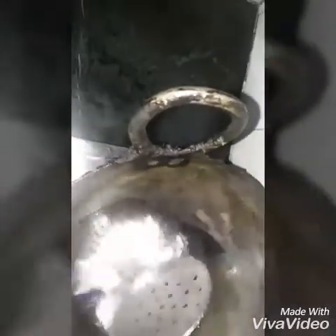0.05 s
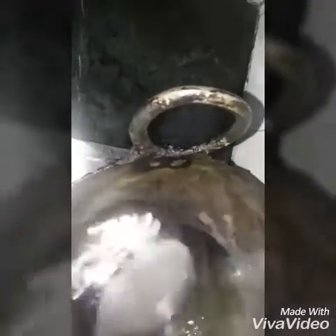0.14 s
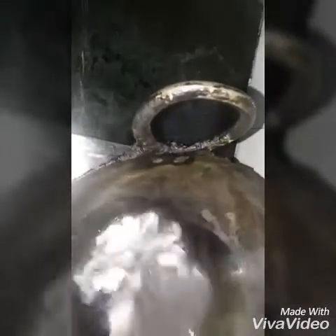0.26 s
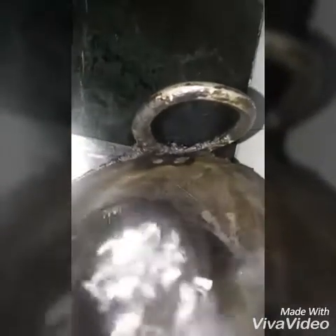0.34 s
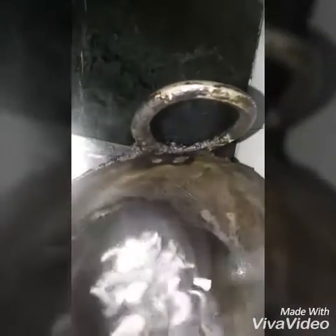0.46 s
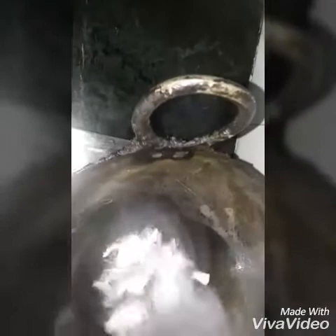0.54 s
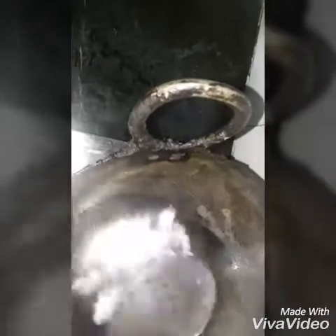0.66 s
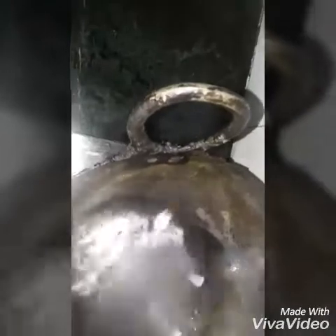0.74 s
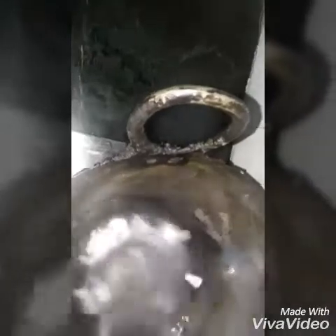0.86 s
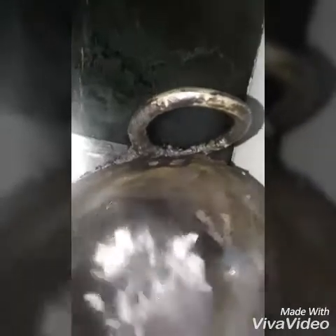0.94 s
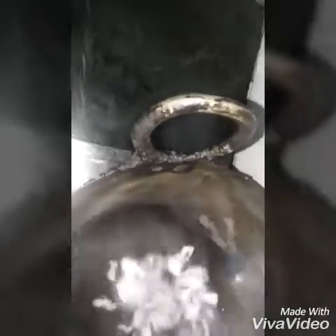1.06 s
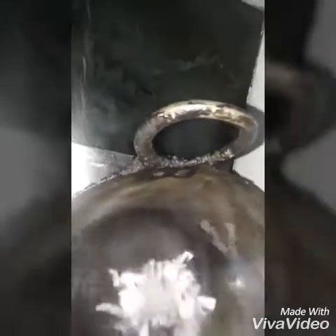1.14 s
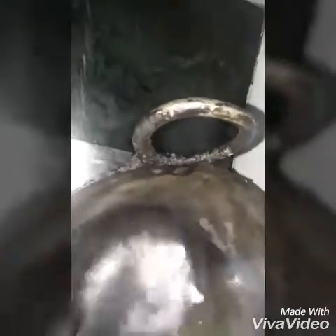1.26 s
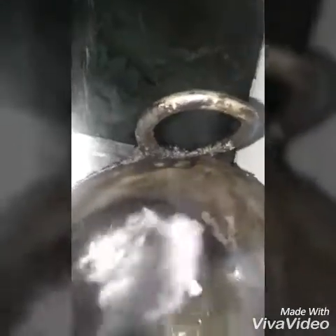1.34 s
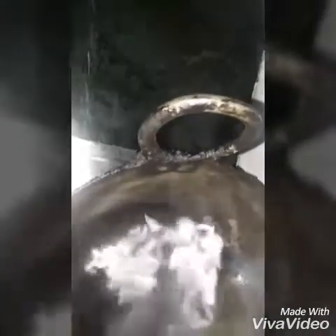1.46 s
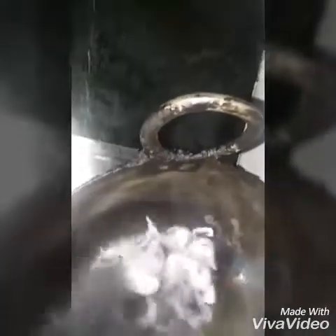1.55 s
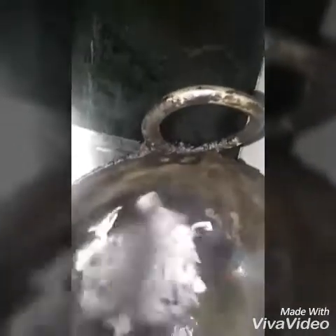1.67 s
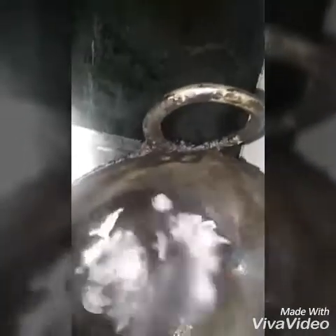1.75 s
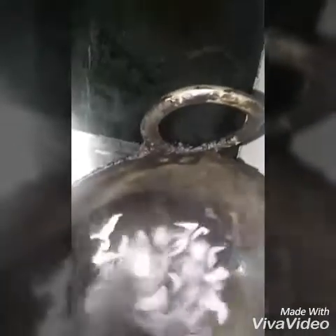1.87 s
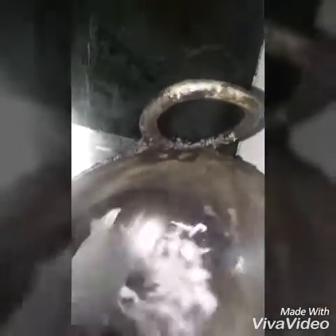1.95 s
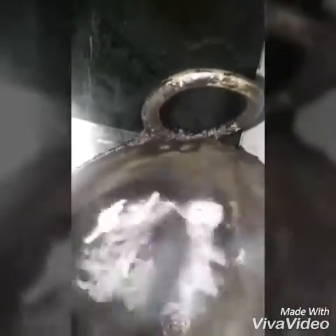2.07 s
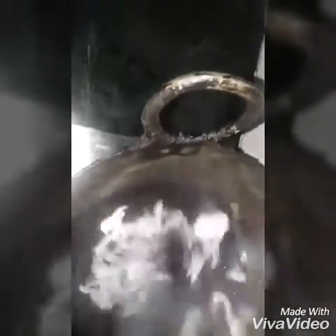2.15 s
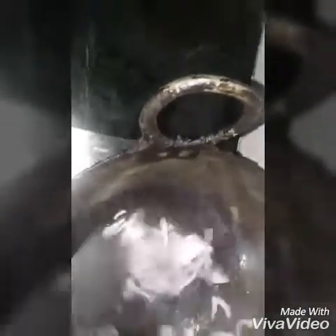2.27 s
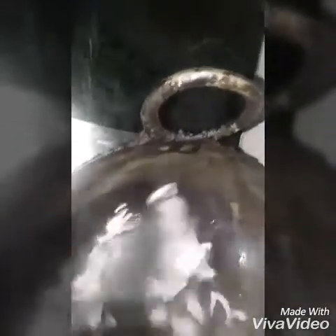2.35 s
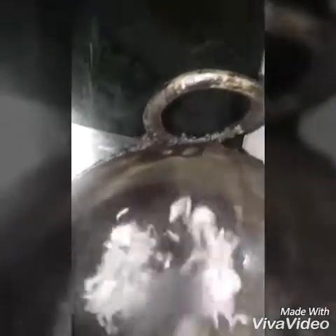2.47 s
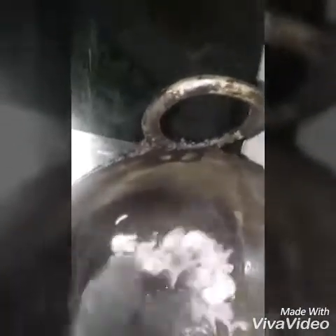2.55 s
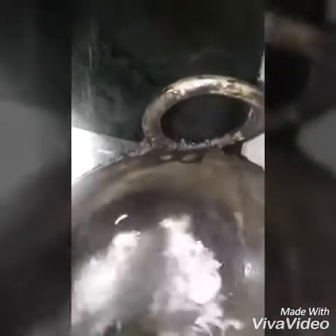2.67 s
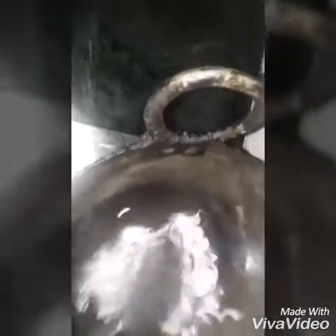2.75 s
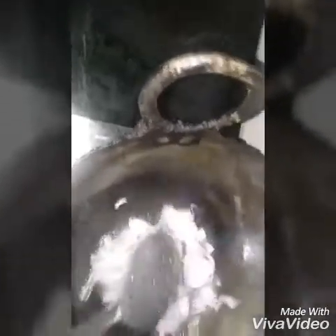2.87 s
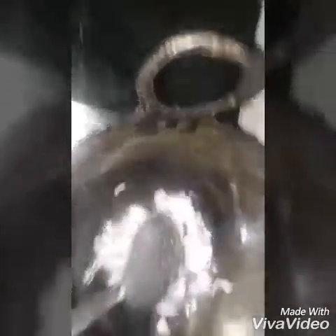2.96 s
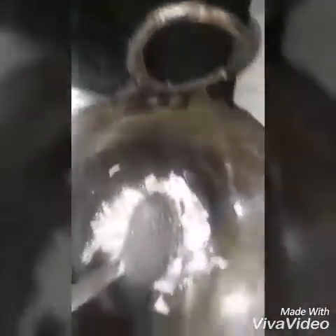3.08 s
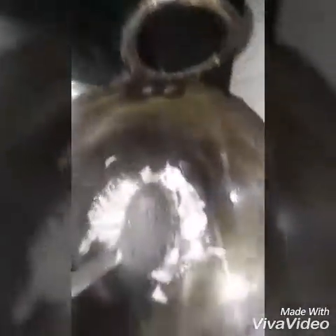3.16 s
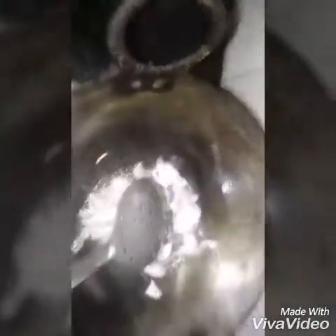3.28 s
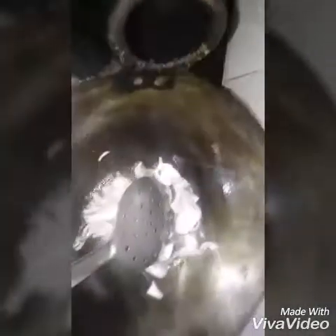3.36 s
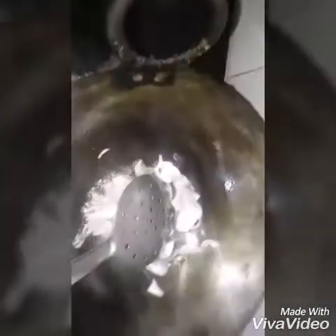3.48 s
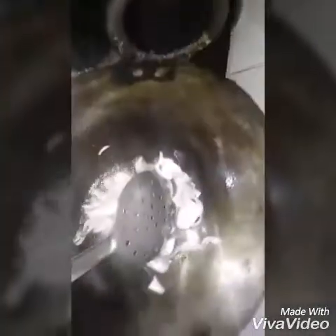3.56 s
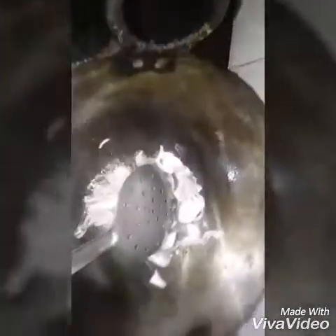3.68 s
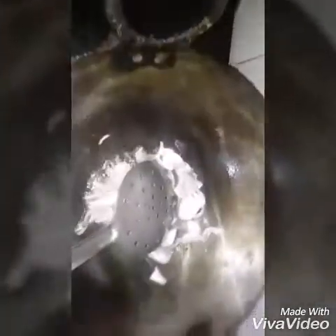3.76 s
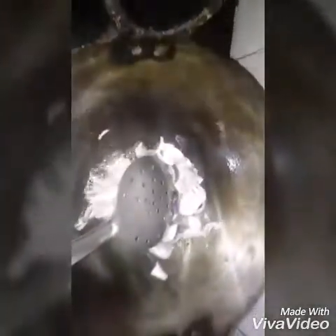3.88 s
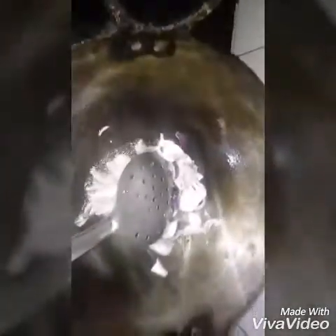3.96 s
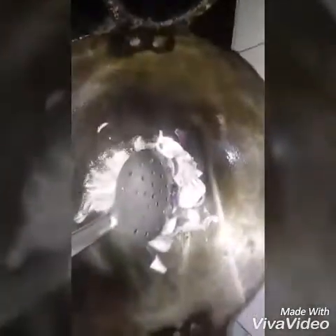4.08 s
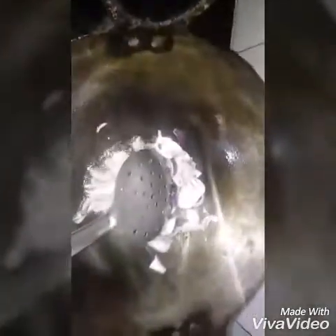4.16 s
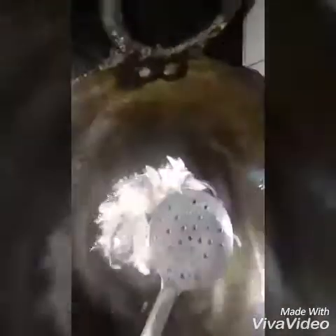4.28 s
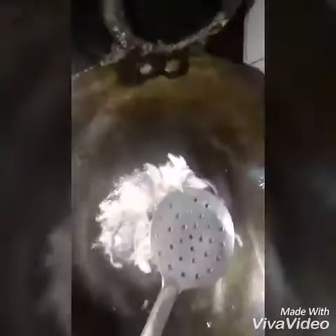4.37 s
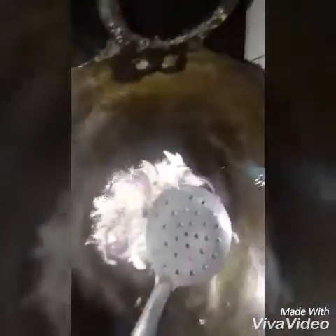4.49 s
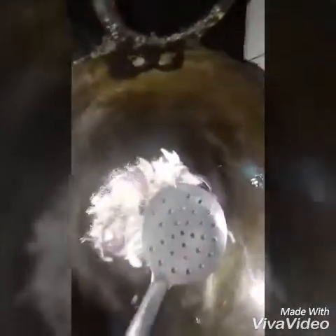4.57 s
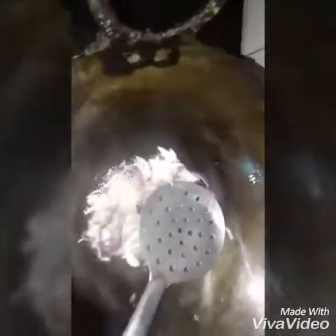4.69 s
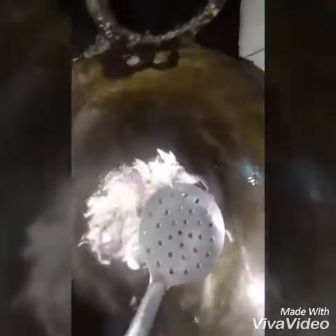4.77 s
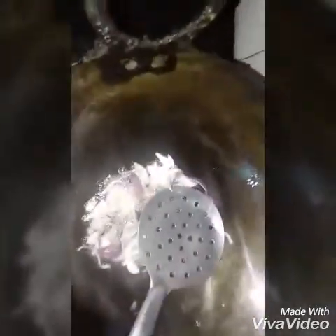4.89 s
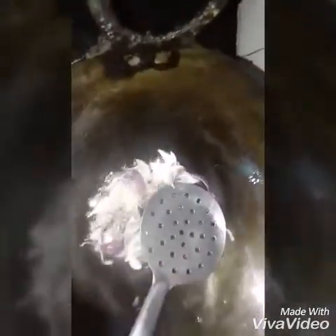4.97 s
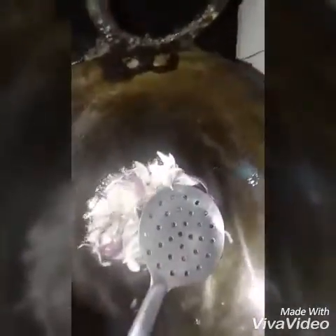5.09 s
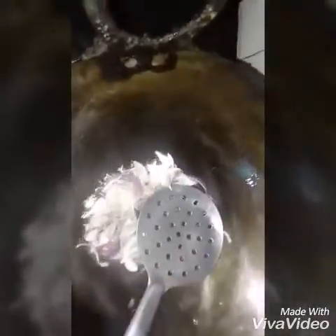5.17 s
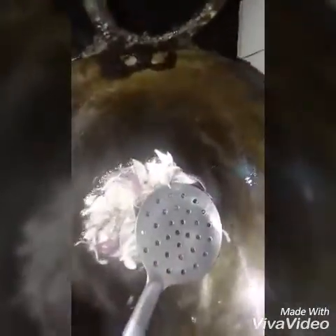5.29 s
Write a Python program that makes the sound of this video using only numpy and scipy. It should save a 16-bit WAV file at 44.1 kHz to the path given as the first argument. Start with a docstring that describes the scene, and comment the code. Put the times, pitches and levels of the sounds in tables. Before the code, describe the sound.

A nearby microphone catches vigorous onion sizzling, bubbling blips and bright popping drops above a faint flame rumble with soft low bumps. Brief drags lead to one hard metallic knock, followed later by a cluster of clicks and rattling touches. The frying then calms, a dry cut click interrupts it, and the remaining sizzle loses treble. Close kitchen walls add slight reverberation; only the treble spreads in stereo.

```python
"""In a small kitchen, chopped onions fry in a metal wok and are turned with a metal spoon.
Clustered noise bursts make the sizzle, decaying tones the bubbles and crackle, short pings and noise the spits.
Wet onion squeals as a noisy, wandering tone; the spoon drags, taps and knocks, ringing the pan's modes.
The burner's shaped noise rumbles below with soft bumps. Late on, the sizzle calms; then an abrupt edit cut
clicks, and the sizzle is duller from there on."""
import sys
import numpy as np
from scipy import signal
from scipy.fft import rfft, irfft
from scipy.io import wavfile

SR = 44100
rng = np.random.default_rng(int(sys.argv[2]) if len(sys.argv) > 2 else 0)


def master(y):
    """Save y as 16-bit WAV."""
    cut = np.clip(np.atleast_2d(y).T, -1, 1)
    pcm = np.round(cut * 32767)  # scale
    wavfile.write(sys.argv[1], SR, pcm.astype(np.int16))


N = 234876
TIME = np.arange(N) / SR

# spoon blows, coloured by the spot and the onion under it; the row at 0.868 s is a sharp, spit-like crack:
# start_s, rise_s, contact_t60_s, rattle_db, boom_db, body_db, clack_db, clink_db, ring_db, crack_db,
# favoured_mode_hz
BLOWS = [(0.802, 0.00044, 0.011, -33, -32.5, -22.5, -28.5, -39, -31.5, -26.5, 1410),
         (0.805, 0.0004, 0.0066, -28, -42, -33.5, -34, -43, -27.5, -26.5, 3860),
         (0.817, 0.0016, 0.055, -25, -42, -43, -38, -47, -41, -30.5, 3860),
         (0.868, 0.0014, 0.024, -35, -51.5, -46, -47, -50, -42, -33.5, 4430),
         (2.607, 0.0015, 0.024, -23, -51.5, -55, -40.5, -54, -63, -57, 1380),
         (2.744, 0.003, 0.017, -22, -52, -46, -38, -38, -41, -28.5, 4460),
         (2.753, 0.001, 0.011, -17, -47.5, -42, -29.5, -32, -33, -32, 3430),
         (2.765, 0.001, 0.018, -23, -55.5, -45, -40, -40, -40, -36, 4430),
         (2.917, 0.0028, 0.017, -31, -41.5, -43.5, -25, -34.5, -28, -27.5, 2900),
         (3.106, 0.0002, 0.012, -17, -49.5, -35.5, -28, -27.5, -36, -35.5, 3230),
         (3.117, 0.00098, 0.026, -18, -54, -40.5, -35, -35, -37.5, -38.5, 3215),
         (3.153, 0.0022, 0.02, -15, -63, -38.5, -36.5, -46, -54, -45, 1102),
         (3.179, 0.001, 0.02, -10, -65, -49, -41, -50, -55, -47, 1420),
         (3.366, 0.0004, 0.007, -22.5, -59.5, -46, -48.5, -42.5, -42.5, -37, 4430),
         (3.871, 0.0007, 0.012, -20, -63.5, -56, -49, -38, -46, -49, 2690),
         (4.055, 0.00048, 0.0068, -25, -70, -59, -53, -47.5, -54, -46.5, 2500),
         (4.1915, 0.0003, 0.0049, -23.5, -59, -46, -39.5, -45, -49, -32.5, 1600),
         (4.524, 0.0011, 0.016, -23, -72, -53, -53, -57, -70, -46.5, 1700),
         (4.742, 0.0005, 0.009, -18.5, -64, -54, -60, -61, -55.5, -51.5, 1033),
         (4.785, 0.002, 0.05, -7, -65.5, -53.5, -58.5, -63, -70, -72, 942),
         (5.24, 0.00086, 0.012, -18, -75, -69, -67, -59.5, -48, -44.5, 3490)]
# modes of pan and spoon: pitch_hz, level_db, undamped_t60_s
PAN_MODES = [(290, -9, .08), (496, -5, .12), (565, -3, .13), (733, -7, .1), (942, -5, .08), (1025, -1, .12),
             (1105, -5, .08), (1190, -4, .06), (1385, 3, .05), (1432, 1, .08), (1622, -2, .06),
             (1710, -3, .06), (2080, -6, .1), (2198, -6, .06), (2500, -7, .04), (2690, -7, .05),
             (2870, -3, .035), (3215, -4, .07), (3445, 1, .05), (3860, -4, .04), (4430, -2, .035),
             (4840, 3, .04), (5150, -4, .03), (5570, -4, .03), (5880, -3, .03)]
# the click of the edit cut: start_s, level_db of its unscaled tones and grit
CUT = (4.5724, -29)
CUT_S = CUT[0]

LIVELY_DB = -47.5   # vigour while the onions are turned
DULL_DB = 13   # the sizzle's treble is lower by this much from the edit cut on
STEREO_WIDTH = .5   # side signal of the sizzle relative to its mid signal
OPPOSITE = np.array([[1], [-1]])   # the side signal enters left and right with opposite signs


def from_db(db):
    """Decibels become an amplitude ratio."""
    return 10 ** (np.asarray(db) / 20)


def rms_one(x):
    """Scales a signal to unit effective value."""
    return x / np.sqrt(np.mean(x ** 2) + 1e-20)


def peak_one(x):
    """Scales a signal to unit peak."""
    return x / np.abs(x).max()


def at_hz(points, hz):
    """Interpolates a level over logarithmic frequency."""
    hz_points, db_points = np.transpose(points)
    return np.interp(np.log(hz), np.log(hz_points), db_points)


def band(x, low_hz, high_hz, order=2):
    """Band-pass filtering keeps one frequency range."""
    edges_hz = [low_hz, min(high_hz, .45 * SR)]
    return signal.sosfilt(signal.butter(order, edges_hz, "band", fs=SR, output="sos"), x)


def resonate(x, hz, width_hz):
    """A two-pole resonance, with gain 1 at its centre."""
    radius = np.exp(-np.pi * width_hz / SR)
    zeros = np.array([1, 0, -1]) * (1 - radius ** 2) / 2
    poles = [1, -2 * radius * np.cos(2 * np.pi * hz / SR), radius ** 2]
    return signal.lfilter(zeros, poles, x)


def colour(x, spectrum):
    """Spectral weighting shapes a steady sound."""
    size = 2 ** 18
    gain = from_db(at_hz(spectrum, np.fft.rfftfreq(size, 1 / SR) + 1))
    return irfft(rfft(x, size) * gain)[..., :N]


def drift(rate_hz):
    """Low-passed noise of unit effective value makes a random drift."""
    r = np.exp(-2 * np.pi * rate_hz / SR)
    slow = signal.lfilter([1], [1, -2 * r, r * r], rng.standard_normal(N + SR))
    return rms_one(slow[SR:])   # without the filter's first second


def add(track, s, sound):
    """Superposition of a sound on a track from a given second."""
    start = int(s * SR)
    track[start:start + len(sound)] += sound[:N - start]


def burst(x, t60, rise_s):
    """An exponential rise and decay shape a sound."""
    t = TIME[:len(x)]
    return x * from_db(-60 * t / max(t60, .002)) * (1 - np.exp(-t / rise_s))


def sine(hz, t):
    """A simple tone of random phase."""
    return np.sin(2 * np.pi * (hz * t + rng.random()))


def burner(level_db=-75):
    """Broadband flame noise rumbles with randomly modulated strength."""
    # spectrum of the flame: pitch_hz, relative_level_db
    flame_spectrum = [(13, -67), (22, -2), (32, -6), (86, 8.5), (123, 0.5), (232, -22), (300, -12),
                      (376, -63), (400, -18), (520, -17), (880, -120)]
    rumble = colour(rng.standard_normal(N), flame_spectrum)
    return from_db(level_db) * rms_one(rumble * from_db(4 * drift(14)))


def low_bumps(bump_db=-1, bump_t60=0.12, lead_s=0.0046, pat_db=-9, pat_t60=.06,
              random_per_s=2, random_db=-60.5, spread_db=6):
    """Filtered noise transients make soft low bumps, each with a pat, at set times and at random."""
    # bumps at set times: start_s, level_db
    set_bumps = [(0.177, -56), (0.516, -58), (0.7, -54), (0.789, -45), (0.879, -53.5), (1.065, -58),
                 (1.242, -53.5), (1.413, -51), (1.588, -66), (1.76, -62), (1.923, -48), (2.107, -48),
                 (2.3, -52), (2.485, -54), (3.29, -61.5), (3.444, -57.5), (3.588, -51.5), (3.937, -57),
                 (4.312, -47.5), (4.513, -50.5), (4.656, -52), (4.813, -54), (4.975, -56), (5.132, -52.5)]
    out = np.zeros(N)
    chance = rng.random((int(random_per_s * N / SR), 2))
    random_bumps = [(when * TIME[-1], random_db + spread_db * (size - .5)) for when, size in chance]
    for s, level_db in list(set_bumps) + random_bumps:
        noise = rng.standard_normal(SR // 4)
        thump = peak_one(band(burst(noise, bump_t60, 0.0033), 65, 126, order=3))
        pat = peak_one(band(burst(noise, pat_t60, 0.0057), 110, 266))
        add(out, max(s - lead_s, 0), from_db(level_db + bump_db) * thump)
        add(out, s, from_db(level_db + pat_db) * pat)
    return out


def kitchen(x, t60=0.38, treble_db=-3):
    """Reverberation of close walls, from 9 ms on; the treble decays faster and differs from side to side."""
    t = TIME[:SR // 2]
    noise = rng.standard_normal((3, len(t)))
    treble = band(noise[:2], 4000, 13000) * from_db(treble_db - 75 * t / t60)
    tail = band(noise[2], 130, 12300) * from_db(-60 * t / t60) + treble
    tail = tail * np.clip(t / .007 - 1.3, 0, 1)   # silent until the first reflections
    return signal.fftconvolve(x[None], tail / np.sqrt(np.sum(tail[0] ** 2)), axes=1)[:, :N]


def bowl(x, spread_db=-9):
    """Early reflections off the wok's wall reach the two sides with opposite sign."""
    echoes = burst(rng.standard_normal(SR // 100), 0.0025, 0.00056)
    side = signal.fftconvolve(x, echoes / np.linalg.norm(echoes))[:N]
    return x + from_db(spread_db) * side * OPPOSITE


def wok(contact, ring_db=-9, scatter_db=2.5):
    """Modal response: a contact is heard directly and through modes of random strength for each spot."""
    t = TIME[:SR // 4]
    ring = 0
    for hz, mode_db, t60 in PAN_MODES:
        strength = from_db(mode_db + scatter_db * rng.standard_normal()) / np.sqrt(t60)
        ring = ring + strength * from_db(-60 * t / t60) * sine(hz, t)
    ringing = signal.fftconvolve(contact, ring / np.linalg.norm(ring))[:len(contact)]
    return contact + from_db(ring_db) * ringing


def mode_gap(x, hz=395, width_hz=110):
    """Anti-resonance: the pan hardly answers between its two lowest modes."""
    return x - resonate(x, hz, width_hz)


def cut_click(length_s=0.00336, grit_db=-6):
    """A gated transient: the abrupt edit cut is heard as a dry click that stops dead, with no ring."""
    # colour of the click: pitch_hz, level_db
    click_tones = [(1020, -6.5), (1750, -9), (2200, -8), (3400, -13.5), (4450, -0.5), (6100, -4)]
    out, t = np.zeros(N), TIME[:int(length_s * SR)]
    tones = sum(from_db(db) * sine(hz, t) for hz, db in click_tones)
    grit = from_db(grit_db) * rms_one(band(rng.standard_normal(len(t)), 2800, 10500))
    add(out, CUT_S, from_db(CUT[1]) * (tones + grit) * signal.windows.tukey(len(t), .2))
    return out


def drags(slips_per_s=170, sing_db=-3, sing_hz=1018, sing_width_hz=22):
    """Stick-slip friction of the dragged rim ticks unevenly, and one mode of the pan sings along."""
    # strokes of the spoon: start_s, length_s, level_db
    strokes = [(0.509, 0.041, -45.5), (0.622, 0.02, -47), (0.697, .018, -50.5), (2.492, 0.095, -52.5)]
    out, t = np.zeros(N), TIME[:SR // 4]
    for s, length_s, db in strokes:
        moving = t < length_s
        slips = (rng.random(len(t)) < slips_per_s / SR) * moving + 1e-6 * moving
        envelope = signal.lfilter([1], [1, -np.exp(-1 / (0.0023 * SR))], slips)
        grit = envelope * rng.standard_normal(len(t))
        rub = rms_one(wok(band(grit, 1100, 6400)))
        sing = rms_one(resonate(grit, sing_hz, sing_width_hz))
        add(out, s, from_db(db) * np.sqrt(length_s / t[-1]) * (rub + from_db(sing_db) * sing))
    return out


def shoves(t60=0.035, rise_s=0.0015):
    """Forced low resonances thud softly as the spoon shoves through the onion."""
    # shoves around the blows: start_s, peak_db
    pushes = [(0.793, -27), (2.61, -45.5), (2.64, -48), (2.75, -39), (2.91, -35.5), (2.934, -35.5),
              (3.099, -46), (3.155, -44), (4.731, -52), (5.141, -54)]
    # low pan resonances that a shove wakes: pitch_hz, width_hz, level_db
    low_resonances = [(295, 90, -6), (517, 150, 0.5)]
    out = np.zeros(N)
    for s, peak_db in pushes:
        push = burst(rng.standard_normal(SR // 2), t60, rise_s)
        thud = 0
        for hz, width_hz, db in low_resonances:
            answer = resonate(resonate(push, hz, width_hz), hz, 3 * width_hz)
            thud = thud + from_db(db) * peak_one(answer)
        add(out, s, from_db(peak_db) * peak_one(thud))
    return out


def clang():
    """Free vibration: the first, hardest blow leaves the metal's modes singing."""
    # singing modes: pitch_hz, level_db, t60_s
    singing_modes = [(496, -39, .12), (564, -33, .16), (735, -35, .11), (1026, -40, .13), (1427, -29, .1),
                     (3463, -24.5, .29), (4830, -31, .05), (8220, -43, .14)]
    out, t = np.zeros(N), TIME[:SR // 2]
    for hz, level_db, t60 in singing_modes:
        add(out, BLOWS[0][0], from_db(level_db) * burst(sine(hz, t), t60, .002))
    return out


def spoon(rattle_t60=0.21, grit_db=5.5, top_db=-12.0, scatter_db=2.5, spot_db=8, spot_octaves=0.063, blow_s=.015):
    """Impact excitation rings the modes, damped by the spoon, and the rim rattles along the pan."""
    out, t = np.zeros(N), TIME[:SR // 3]
    edges_hz = [250, 750, 1250, 1900, 2950, 4200, 6500, 13000]

    def strength(x):
        """Effective value over the span of the blow."""
        return np.sqrt(np.mean(x[:int(blow_s * SR)] ** 2))

    for s, rise_s, contact_t60, rattle_db, *colour_db, spot_hz in BLOWS:
        noise = rng.standard_normal((3, len(t)))
        slips = from_db(grit_db * rms_one(band(noise[2], 58, 290, order=1)))
        rattle = wok(burst(noise[1] * slips, rattle_t60, 0.0034), ring_db=-9.5)
        contact = burst(noise[0], contact_t60, rise_s) + from_db(rattle_db) * rattle
        damping = min(contact_t60 / .02, .9)   # a brief touch lets the modes die away sooner
        modes = 0
        for hz, db, t60 in PAN_MODES:
            favour_db = spot_db * np.exp(-(np.log2(hz / spot_hz) / spot_octaves) ** 2)
            mode_db = db + favour_db + scatter_db * rng.standard_normal()
            modes = modes + from_db(mode_db) * burst(sine(hz, t), t60 * damping, rise_s)
        metal = modes / strength(modes) + contact / strength(contact)
        # the top band has no column of its own: it follows the crack band
        for db, low, high in zip(colour_db + [colour_db[-1] + top_db], edges_hz, edges_hz[1:]):
            part = band(metal, low, high, order=4)
            dull_db = DULL_DB / 2 * (s > CUT_S and high == edges_hz[-1])
            add(out, s, from_db(db - dull_db) * part / strength(part))
    return out


def vigour(flare_db=1.5, flare_s=0.103):
    """Boiling rate in dB: each touch of the spoon puts wet onion on hot metal, which flares and relaxes."""
    # vigour of the frying, lively and then calmer: time_s, level_db
    frying = [(0.0, -52), (0.32, -54), (0.7, -47.5), (1.01, -52), (1.34, -47.5), (1.7, -50.5), (1.88, -48),
              (2.32, -48.5), (2.54, -47.5), (3.04, -48.5), (3.38, -55.5), (3.75, -63), (3.95, -61.5),
              (4.07, -59.5), (4.22, -56.5), (4.41, -60.5), (4.5, -61)]
    # vigour after the edit cut: time_s, level_db
    settled = [(4.6, -63), (5.32, -67)]
    s, db = np.transpose(np.vstack([frying, settled]))
    flares = [(TIME > row[0]) * np.exp(-np.abs(TIME - row[0]) / flare_s) for row in BLOWS]
    return np.interp(TIME, s, db) + flare_db * np.max(flares, axis=0)


def steam(rest_db=-3, rest_hz=4600, follows=0.85, waver_db=3, wander_hz=300,
          rise_s=0.022, fall_s=.05, sag_hz_per_s=3000):
    """Power addition of a leak that follows the frying and of presses; gives level in dB and mean pitch in Hz."""
    # onion pressed on the metal: loudest_s, level_db, pitch_hz
    presses = [(0.521, -40.5, 4540), (0.601, -43.5, 5060), (0.735, -41, 5040), (0.999, -45.5, 4790),
               (1.32, -43.5, 4670), (1.71, -46, 4400), (1.862, -41.5, 5130), (1.95, -46, 4385),
               (2.001, -46, 4050), (2.07, -46.5, 4460), (2.26, -45, 4950), (2.39, -44.5, 4690),
               (2.45, -42, 4900), (2.57, -43.5, 4730), (2.858, -45, 4445), (3.097, -40.5, 5200),
               (3.571, -45, 4590), (3.749, -49, 3796), (4.282, -51.5, 5040), (4.78, -51, 4550),
               (4.899, -54.5, 3510)]
    leak_db = LIVELY_DB + rest_db + follows * (vigour() - LIVELY_DB) + waver_db * drift(8.05)
    power = from_db(leak_db) ** 2
    weighted_hz = power * (rest_hz + wander_hz * drift(6))
    for s, db, hz in presses:
        t = TIME - s
        press = (from_db(db) * np.exp(-np.maximum(-t / rise_s, t / fall_s))) ** 2
        power = power + press
        weighted_hz = weighted_hz + press * (hz - sag_hz_per_s * t)
    return 10 * np.log10(power), weighted_hz / power


def squeal(width_hz=380, level_db=-3, wander_hz=150):
    """Narrow-band noise: steam sputters out under the onion as a rough squeak of wandering pitch."""
    steam_db, hz = steam()
    phase = 2 * np.pi * np.cumsum(hz + wander_hz * drift(25.0)) / SR
    squeak = drift(width_hz) * np.cos(phase) + drift(width_hz) * np.sin(phase)
    sputter = from_db(3 * drift(45))
    return from_db(steam_db + level_db) * rms_one(squeak * sputter)


def bubbles(per_s=220, level_db=-5.5, size_db=4.0, cycles=14):
    """Damped bubble oscillation: simmering water in the onion makes rising blips of scattered pitch."""
    middle_db = fry_levels()[1]   # blips follow the middle of the sizzle
    out, t = np.zeros(N), TIME[:SR // 20]
    for when, pitch, size in rng.random((int(per_s * N / SR), 3)):
        hz = 1000 * 4 ** pitch
        blip_db = middle_db[int(when * N)] + level_db + size_db * min(-np.log(1 - size), 2)
        blip = burst(np.sin(2 * np.pi * hz * t * (1 + 4 * t)), cycles / hz, 0.00039)
        add(out, when * N / SR, from_db(blip_db) * blip)
    return out


def crackle(clusters_per_s=75, count=5, cluster_s=.008, level_db=4, spatter_s=.04, spatter_db=4,
            size_db=3.5, cycles=5, low_hz=1800, high_hz=7500):
    """Clustered damped pulses: oil bubbles crack open, and every blow throws a spatter of them."""
    out, t, vigour_db = np.zeros(N), TIME[:SR // 100], vigour()
    starts_s = rng.random(int(clusters_per_s * N / SR)) * TIME[-1]
    clusters = [(s, cluster_s, 0) for s in starts_s]
    spatters = [(s, spatter_s, spatter_db) for s, *_ in BLOWS]
    for start_s, span_s, extra_db in clusters + spatters:
        for delay, pitch, size in rng.random((count, 3)):
            s = min(start_s - span_s * np.log(1 - delay), TIME[-2])
            hz = low_hz * (high_hz / low_hz) ** pitch
            crack_db = vigour_db[int(s * SR)] + level_db + extra_db + size_db * min(-np.log(1 - size), 3)
            crack_db = crack_db - DULL_DB * pitch * (s > CUT_S)
            decay = from_db(-60 * t * hz / (2 * cycles))
            add(out, s, from_db(crack_db) * decay * np.sin(2 * np.pi * hz * t))
    return out


def small_spits(per_s=20, level_db=2.5, usual_hz=4730, spread_db=6.0, spread_octaves=0.2,
                snap_db=-7, snap_spread_db=5):
    """Random arrivals: lesser drops burst as strongly as the frying is lively; columns as for big drops."""
    chance = rng.random((int(per_s * N / SR), 4))
    s = chance[:, 0] * TIME[-1]
    size, pitch, snap = np.sqrt(12) * (chance[:, 1:].T - .5)   # uniform, with standard deviation 1
    db = np.interp(s, TIME, vigour()) + level_db + spread_db * size
    snaps_db = db + snap_db + snap_spread_db * snap - DULL_DB * (s > CUT_S)
    return list(zip(s, db, usual_hz * 2 ** (spread_octaves * pitch), snaps_db))


def spits(ping_s=.0007, bounce_s=0.0026, bounce_db=-7, ping_db=2, spurt_t60=0.086, snap_t60=0.0026,
          tick_t60=0.045, width_hz=700, spurt_db=-7, crack_db=5, tick_db=-5):
    """Impulsive bursting: a drop snaps, its ping bounces across the wok, steam spurts and the pan ticks."""
    # bigger drops: start_s, level_db, pitch_hz, snap_level_db
    big_drops = [(0.0278, -36, 4500, -31.5), (0.065, -33.5, 4630, -42), (0.215, -33.5, 4720, -46),
                 (0.237, -31, 4380, -26.5), (0.248, -37, 4900, -30), (0.298, -42, 4700, -38),
                 (0.305, -40, 4370, -35), (0.394, -31, 4860, -32), (0.4834, -29.5, 3140, -27.5),
                 (0.5842, -22.5, 4950, -49.5), (0.6075, -26, 5300, -26.5), (0.629, -37, 3660, -34),
                 (0.637, -39, 2900, -32.5), (0.661, -30.5, 5100, -31), (0.6896, -26.5, 4600, -41),
                 (0.714, -28, 4910, -33), (0.7345, -27, 4820, -50), (0.7417, -21.5, 5130, -50),
                 (0.778, -28, 5100, -32), (0.9264, -26.5, 4440, -59), (0.9877, -21.5, 4610, -22.5),
                 (1.04, -27.5, 5170, -27), (1.057, -27, 2580, -32), (1.134, -23.5, 4440, -35),
                 (1.1629, -36.5, 2800, -32.5), (1.219, -19.5, 4780, -37.5), (1.2376, -31, 5080, -29),
                 (1.259, -22, 4990, -32), (1.308, -34, 4300, -24), (1.3741, -26, 4430, -24),
                 (1.3931, -29, 4930, -25), (1.4233, -27, 5300, -25.5), (1.4653, -25, 4415, -20.5),
                 (1.6559, -34, 4520, -31.5), (1.6954, -22.5, 4370, -21), (1.8402, -27, 5130, -30.5),
                 (1.846, -29.5, 5370, -34), (2.0524, -32, 4340, -30), (2.064, -32, 4630, -37),
                 (2.0883, -31.5, 4400, -39), (2.2047, -50, 6520, -33), (2.286, -41, 2310, -42),
                 (2.316, -34, 2560, -46), (2.3742, -27.5, 4850, -28), (2.386, -32, 4950, -28),
                 (2.393, -32, 4800, -38), (2.534, -22.5, 5000, -23), (2.6326, -34.5, 4600, -33),
                 (2.6642, -25, 4650, -47), (2.9863, -30, 4970, -25.5), (3.0564, -30.5, 4510, -27.5),
                 (3.0798, -27, 4420, -25.5), (3.266, -44, 5600, -39), (3.2837, -30.5, 4930, -31),
                 (3.4241, -50, 5000, -29.5), (3.462, -40, 5370, -36), (3.535, -43, 3400, -42),
                 (3.5478, -38.5, 4910, -35), (3.576, -38, 4300, -42), (3.6589, -42, 4640, -27.5),
                 (3.733, -39, 4380, -37.5), (3.7465, -32.5, 3654, -48), (3.953, -46, 5100, -42),
                 (3.9986, -30, 5510, -41), (4.039, -43, 4980, -42), (4.1206, -40, 5630, -37),
                 (4.331, -37.5, 5890, -33.5), (4.667, -38.5, 4320, -68), (4.891, -44, 3500, -73)]
    out, ticks = np.zeros((2, N))
    t = TIME[:SR // 12]
    for s, level_db, hz, snap_db in list(big_drops) + small_spits():
        noise = rng.standard_normal((3, len(t)))
        # a direct ping and two weaker bounces
        swell = sum(from_db(k * bounce_db) * np.exp(-((t - k * bounce_s) / ping_s - 2) ** 2) for k in range(3))
        ping = swell * np.sin(2 * np.pi * hz * t)
        spurt = peak_one(resonate(burst(noise[0], spurt_t60, .001), hz, width_hz))
        snap = peak_one(band(burst(noise[1], snap_t60, 0.00062), 3160, 9500))
        tick = peak_one(band(burst(noise[2], tick_t60, 0.0001), 920, 5300))
        add(out, s, from_db(level_db + ping_db) * ping + from_db(level_db + spurt_db) * spurt)
        add(out, s + ping_s, from_db(snap_db + crack_db) * snap)
        add(ticks, s + ping_s, from_db((level_db + snap_db) / 2 + tick_db) * tick)
    return out + wok(ticks, ring_db=-9, scatter_db=4.5)


def fry_levels(crackle_room_db=2.5):
    """Spectral balance: livelier frying raises the low, middle and treble levels of the sizzle unequally."""
    # low crackle, middle and treble: lively_level_db, share_of_swing
    fry_law = [(-44.5, 0.41), (-38.5, 0.68), (-42.5, 0.82)]
    swing_db = vigour() - LIVELY_DB
    low_db, middle_db, treble_db = [db + share * swing_db for db, share in fry_law]
    # the hiss lies lower where the crackle is strongest
    return np.array([low_db, middle_db - crackle_room_db, treble_db - DULL_DB * (TIME > CUT_S)])


def sizzle(per_s=600, size_db=3.0, hiss_db=-6.0, patchy_db=2.06, level_db=-0.57, flutter_db=1.7,
           hollow_hz=2940, hollow_octaves=0.17, hollow_depth_db=17, hollow_s=.3):
    """Shot noise: random steam bursts overlap in each frequency band over a fine hiss."""
    # the wok's colouring of the sizzle: pitch_hz, level_db
    wok_spectrum = [(200, -26), (330, -35), (420, -40), (620, -8.5), (830, -10), (1030, 5), (1200, -11.5),
                    (1450, 1.5), (1900, -1), (2900, -5), (4500, 1.5), (6000, -1), (8000, -0.5),
                    (13000, -4.5)]
    # centres of low, middle and treble: pitch_hz
    centres_hz = [1400, 3000, 7000]
    density_db = fry_levels()
    # for a moment after the edit cut the sizzle sounds hollow
    hollow = (TIME > CUT_S) & (TIME < CUT_S + hollow_s)
    together_db = level_db + flutter_db * drift(26)
    edges_hz = [180, 700, 1000, 1400, 1900, 2500, 3200, 4000, 5000, 6200, 7600, 9200, 11000, 14000]
    out = 0
    for low, high in zip(edges_hz, edges_hz[1:]):
        born = np.flatnonzero(rng.random(N) < per_s / SR)
        power = np.zeros(N)
        power[born] = from_db(size_db * np.minimum(rng.exponential(1, len(born)), 5)) ** 2
        # the power of each burst decays within a few milliseconds
        decaying = signal.lfilter([1], [1, -np.exp(-1 / (0.0054 * SR))], power + 1e-18)
        puffs = rms_one(np.sqrt(decaying))
        envelope = np.hypot(puffs, from_db(hiss_db))
        fizz = band(rms_one(rng.standard_normal((2, N)) * envelope), low, high, order=3)
        middle_hz = np.sqrt(low * high)
        shares = [np.interp(np.log(middle_hz), np.log(centres_hz), one) for one in np.eye(len(centres_hz))]
        octaves = np.log2(middle_hz / hollow_hz)
        hollow_db = hollow * hollow_depth_db * np.exp(-(octaves / hollow_octaves) ** 2)
        band_db = np.dot(shares, density_db) - hollow_db + together_db + patchy_db * drift(25.5)
        out = out + fizz * from_db(band_db)
    mid, side = colour(out, wok_spectrum)
    return mid + STEREO_WIDTH * side * OPPOSITE


def scene():
    """Superposition of the frying, the struck pan, the room's answer, the burner and the click."""
    drops = spits() + bubbles() + crackle()
    knocks = spoon() + drags()
    room = kitchen(from_db(-11.0) * drops + from_db(-14.0) * knocks)
    struck = mode_gap(knocks + shoves() + clang() + room)
    background = burner() + low_bumps() + cut_click()
    return background + struck + bowl(squeal() + drops) + sizzle()


def record(dry, side_from_hz=4200, cutoff_hz=13250):
    """Mid-side filtering: only the treble is stereo, and the top is cut."""
    mid = dry.mean(0)
    side_filter = signal.ellip(10, .3, 75, side_from_hz, "high", fs=SR, output="sos")
    side = signal.sosfilt(side_filter, (dry[0] - dry[1]) / 2)
    both = mid + side * OPPOSITE
    return signal.sosfilt(signal.ellip(10, .3, 75, cutoff_hz, fs=SR, output="sos"), both)


dry = scene()
out = record(dry)
master(out)
```